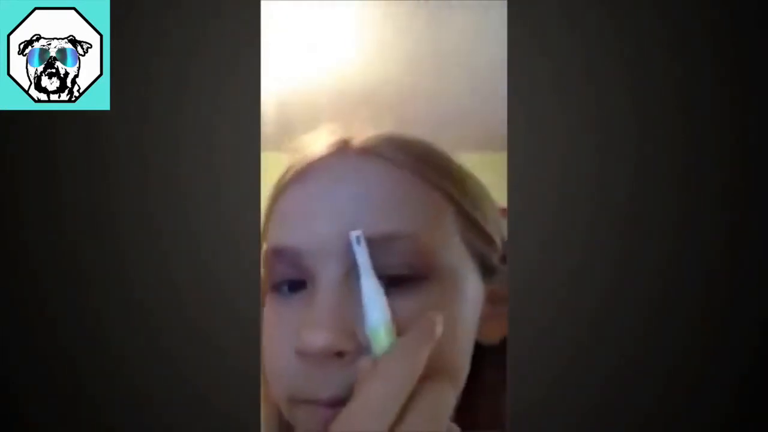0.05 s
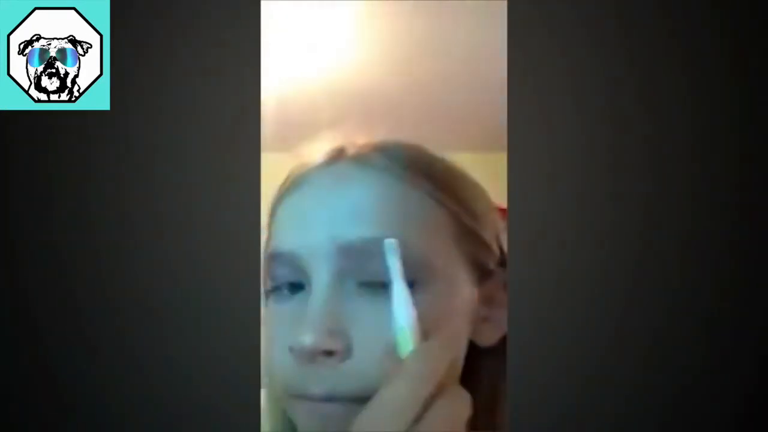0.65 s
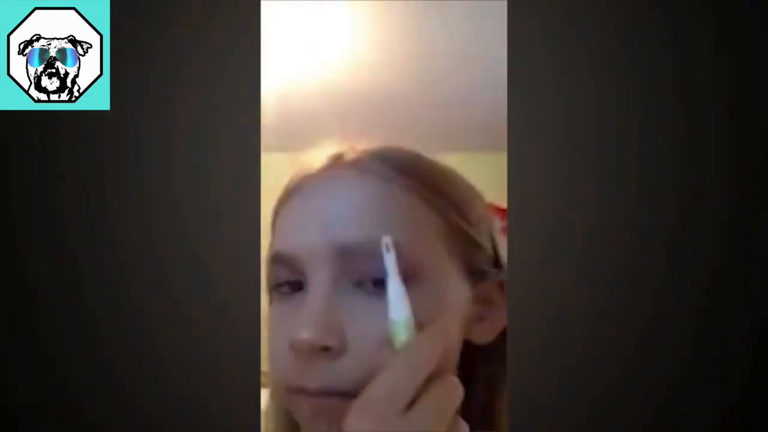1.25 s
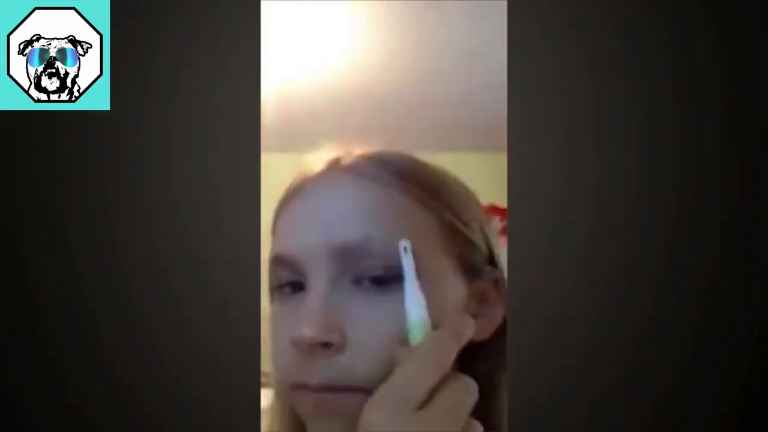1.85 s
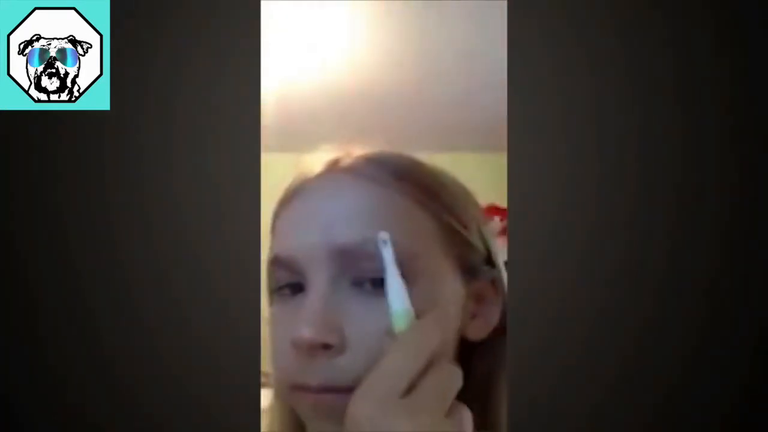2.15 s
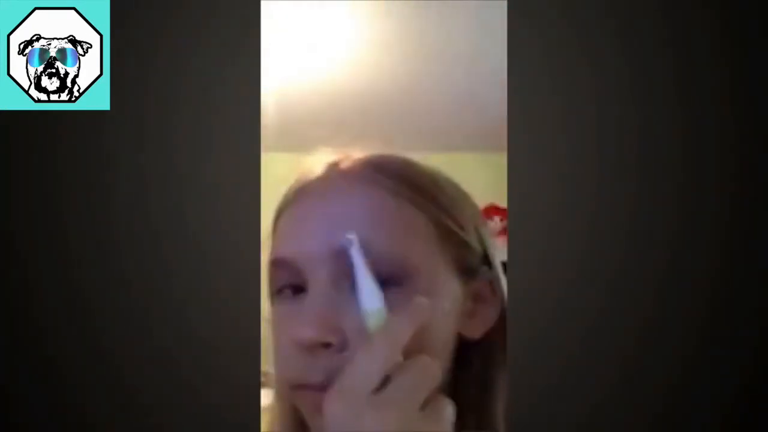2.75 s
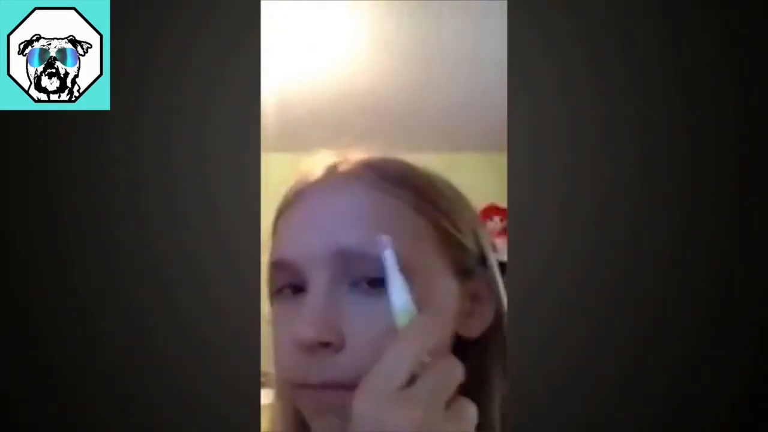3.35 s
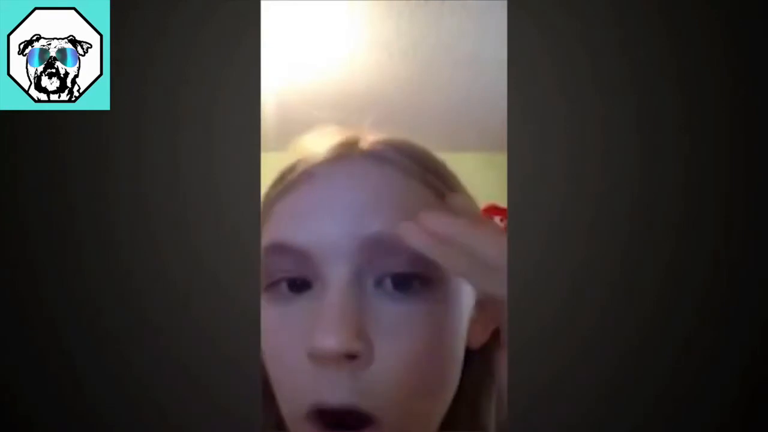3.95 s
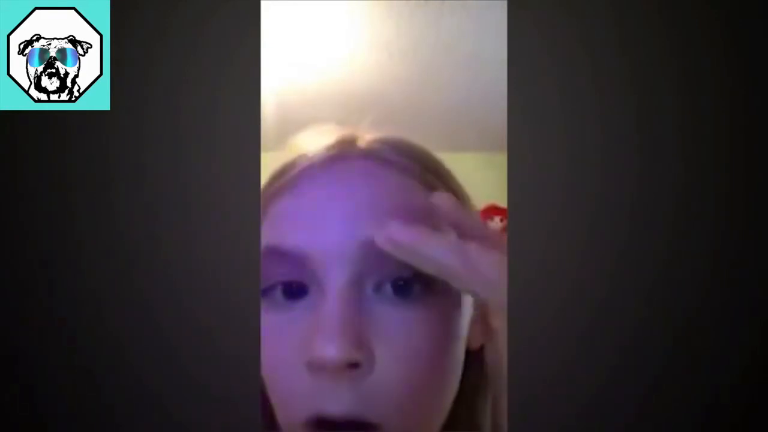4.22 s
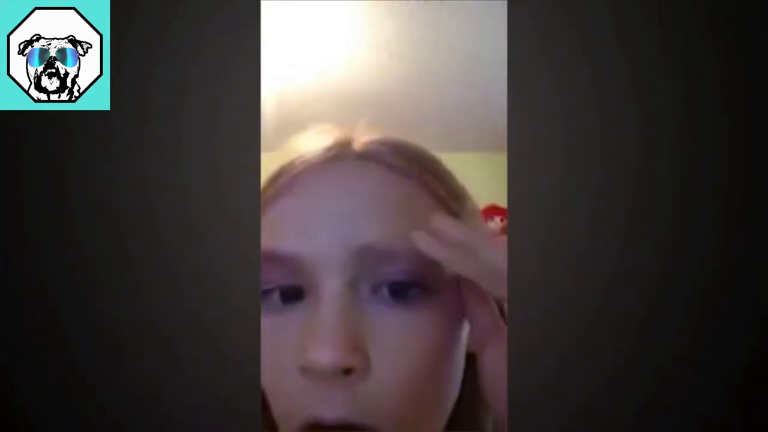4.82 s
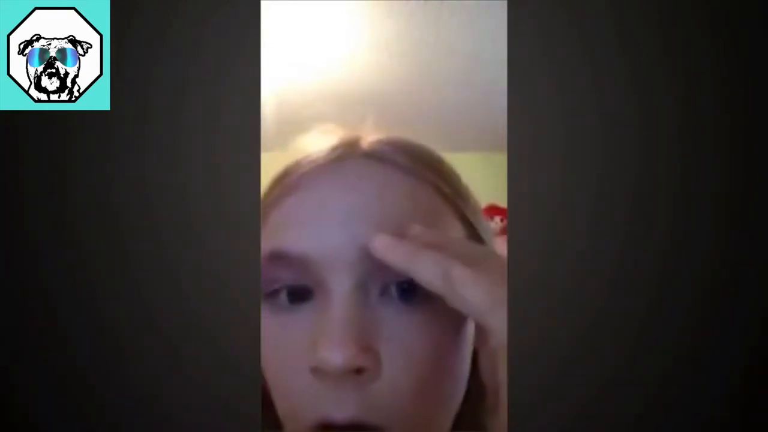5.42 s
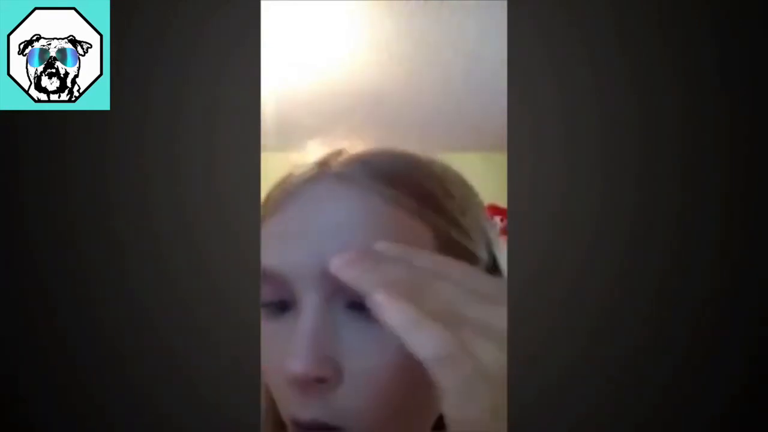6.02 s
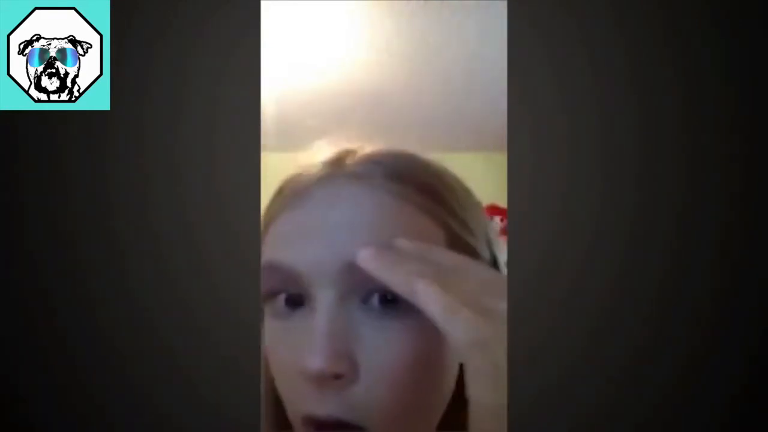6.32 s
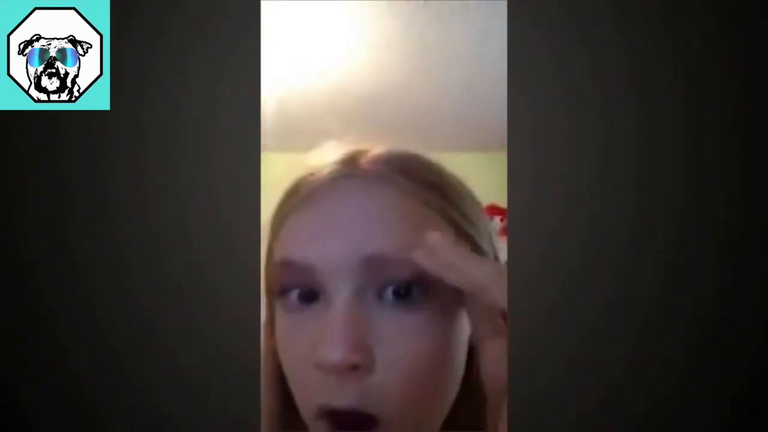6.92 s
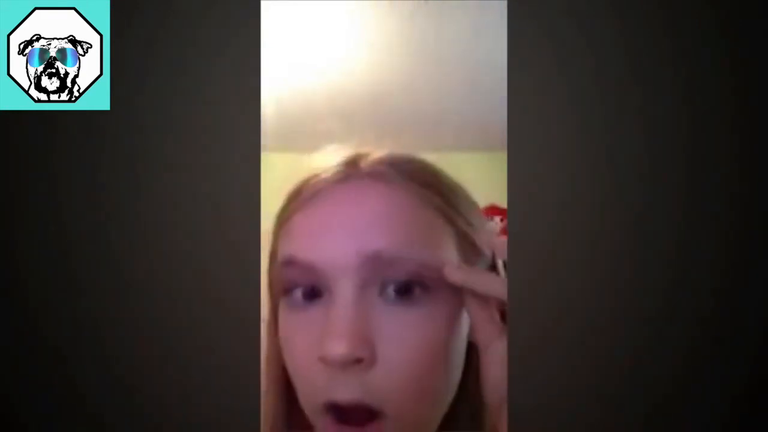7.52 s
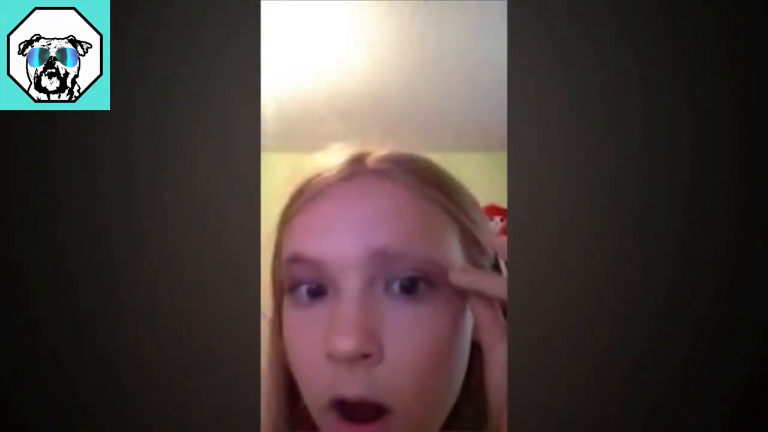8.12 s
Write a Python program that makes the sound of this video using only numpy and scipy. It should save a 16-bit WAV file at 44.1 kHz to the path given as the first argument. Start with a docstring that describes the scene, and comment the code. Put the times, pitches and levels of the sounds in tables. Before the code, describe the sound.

From the start, a small battery eyebrow trimmer buzzes close to a phone microphone in a bedroom. The sound is fairly quiet, thin and bright, a fast rattle in a plastic shell with a faint motor whine and little bass. The motor slows slightly as it presses against skin five times, at about 0.6, 1.3, 1.9, 2.4 and 3.3 seconds. Around 3.7 seconds there is a soft, brief knock with a dull rub as the trimmer is swung away. The buzz shifts in tone, sizzles briefly at 4 seconds, then runs on more evenly. Just after 6 seconds it swells a little and dips in pitch, then switches off abruptly at about 6.4 seconds. Only a thin hiss and the very faint hum of a distant appliance remain until the end, at about 8 seconds.

```python
"""Eyebrow trimmer in a bedroom

Close to a phone's microphone, a small battery drive rattles in a thin plastic shell, about 46 strokes
a second. It is pressed to the brow five times, which slows the motor, swung away with a soft knock,
held lower down, then switched off. A faint hum from a distant appliance and a thin hiss remain."""
import sys
import numpy as np
from scipy import signal
from scipy.fft import rfft, irfft, next_fast_len
from scipy.io import wavfile
from scipy.ndimage import map_coordinates

SR = 44100
rng = np.random.default_rng(int(sys.argv[2]) if len(sys.argv) > 2 else 0)


def master(y):
    """Save y as 16-bit WAV."""
    cut = np.clip(np.atleast_2d(y).T, -1, 1)
    pcm = np.round(cut * 32767)  # scale
    wavfile.write(sys.argv[1], SR, pcm.astype(np.int16))


N = 360076
T = np.arange(N) / SR

# the shell's resonances and notches in each of four holds: (centre [Hz], width [Hz], gain [dB])
BROW_PEAKS = [(1393, 21, 8.5), (1637, 100, -6.5), (2724, 204, 3.5), (3740, 99, 3), (4165, 205, -6.5),
              (4585, 830, 7), (5920, 390, -5), (6944, 17, 10), (7830, 103, -13), (10100, 170, 4.5)]
SWUNG_PEAKS = [(2250, 370, 7), (4230, 120, -7), (6050, 470.0, 0.5), (8330, 340, 3.5)]
LOWERED_PEAKS = [(1480, 150, 4.5), (2060, 156, 9.5), (2250, 400, -10), (3500, 140, 2.5), (3530, 244, 6.5),
                 (4170, 95, -4.5), (5570, 310, 9), (6120, 87, 9.5), (6490, 240, 7.5), (7170, 580, 5),
                 (7920, 210, -13.5), (8700, 145, 3.5), (13250, 500, 5.5), (14200, 270, -2)]
SWITCH_PEAKS = [(1280, 560, 11), (3490, 460, 8.5), (5420, 370, 9.5), (7000, 1150, 6.5), (7760, 190.0, -10)]
# the hand passes from one hold to the next: (start [s], end [s])
REGRIPS = [(3.55, 3.91), (3.9, 4.086), (6.12, 6.19)]
# the cutting head's broad ring, which skin damps: (time [s], gain [dB])
HEAD_RING = [(0, -1), (.7, 1), (1.0, 1), (1.7, 0), (2.52, -2.5), (2.65, -9), (2.78, -0.5), (3.35, 0.2),
             (3.62, -4.5), (3.82, -3), (3.94, 5), (4.1, -1), (6.3, -1)]
# the part of the buzz that sizzles: (frequency [Hz], share [0-1])
SIZZLE_SHARE = [(8000, 0.15), (11000, 0.75)]
def trimmer(level_db, head_hz=5000, head_width_hz=740, off_s=6.357, stop_t60_s=0.1):
    """Close to the microphone, the buzz changes colour with the hold and dies as the power is cut."""
    force = drive(idle_db=-0.5, rattle_db=0.0, scrape_db=-2.5, uneven_db=0.31)
    buzz = shell(force, BROW_PEAKS)
    for span, peaks in zip(REGRIPS, (SWUNG_PEAKS, LOWERED_PEAKS, SWITCH_PEAKS)):
        share = np.interp(T, span, (0, 1))
        buzz = (1 - share) * buzz + share * shell(force, peaks)
    buzz_db, sizzle_db = handling()
    head = band(buzz, lambda hz: bell(hz, head_hz, head_width_hz))
    sizzle = band(buzz, lambda hz: along(SIZZLE_SHARE, hz))
    buzz = buzz + (amp(curve(HEAD_RING)) - 1) * head + (amp(sizzle_db) - 1) * sizzle
    buzz += whine(flutter_db=1.5)
    stop_db = -60 * np.maximum(T - off_s, 0) / stop_t60_s
    return buzz * amp(level_db + buzz_db + stop_db)


# the blade's blows and rebounds, repeating every three strokes:
# (position [strokes], width [strokes], level on the brow [dB], level running free [dB])
BLADE_BLOWS = [(.33, 0.17, -6.5, -1), (.56, 0.24, 0, -0.5), (1.45, 0.1, 1.5, 4), (1.71, 0.15, 0.5, 3.5),
               (2.4, 0.11, 2, 1.5), (2.69, 0.19, -8, 0.5)]
def drive(idle_db, rattle_db, scrape_db, uneven_db, cycle=3):
    """Contacts, rattle and blade scrape, all swelling with each blow of the blade."""
    strokes = strokes_done()
    free = np.interp(T, REGRIPS[0], (0, 1))
    power = amp(idle_db) ** 2
    for position, width, brow_db, free_db in BLADE_BLOWS:
        apart = (strokes - position + cycle / 2) % cycle - cycle / 2
        blow_db = (1 - free) * brow_db + free * free_db
        power = power + amp(blow_db) ** 2 * bell(apart, 0, width)
    stroke_gain = amp(uneven_db * rng.standard_normal(N)[strokes.astype(int)])
    clicks = contacts(strokes, jitter_s=9e-6, scatter_db=7) + amp(rattle_db) * rattle(per_second=2200)
    scrape = amp(scrape_db) * rng.standard_normal(N)
    return np.sqrt(power) * stroke_gain * (clicks + scrape)


# hard, tiny contacts carry little bass: (frequency [Hz], gain [dB])
CONTACT_COLOUR = [(700, -5.5), (1400, 0.5), (3000, -1.5), (6500, -3), (12000, -1.5)]
def contacts(strokes, jitter_s, scatter_db, count=80):
    """The same rough spots meet in every stroke, never quite equally hard."""
    spots = (np.arange(count) + rng.random(count)) / count
    at = np.arange(-1, int(strokes[-1]) + 1)[:, None] + spots
    sizes = np.sign(rng.standard_normal(count)) * amp(scatter_db * (2 * rng.random(at.shape) - 1))
    times = np.interp(at, strokes, T) + jitter_s * rng.standard_normal(at.shape)
    inside = (at > strokes[0]) & (at < strokes[-1])
    clicks = pulses(times[inside], sizes[inside])
    return unit(coloured(clicks, lambda hz: along(CONTACT_COLOUR, hz)))


def rattle(per_second):
    """Loose parts click at random moments."""
    hits = rng.random(N) < per_second / SR
    return unit(hits * (2 * rng.random(N) - 1))


# how the small shell radiates: (frequency [Hz], gain [dB])
SHELL_COLOUR = [(100, -57), (450, -30), (1000, -23), (1800, -16.5), (2700, -0.7), (5000, -0.0), (9000, 0.5),
                (10500, -5.5), (12000, -12.5), (13500, -14)]
def shell(force, peaks):
    """The plastic shell's ring under one hold of the fingers, at rms 1."""
    def peaks_db(hz):
        return sum(db * bell(hz, centre, width) for centre, width, db in peaks)
    return unit(coloured(force, lambda hz: along(SHELL_COLOUR, hz) + peaks_db(hz)))


# motor tones: (frequency [multiples of the stroke rate], unloaded level against the buzz [dB])
MOTOR_TONES = [(29, -51), (30, -38), (31, -40)]
def whine(flutter_db, flutter_hz=30, db_per_load=-1.7):
    """The motor's thin tone follows the drive's speed, flutters a little and fades under load."""
    strokes = strokes_done()
    tones = np.zeros(N)
    for multiple, db in MOTOR_TONES:
        flutter = map_coordinates(rng.standard_normal((N // SR + 2) * flutter_hz), [T * flutter_hz])
        phase = 2 * np.pi * (multiple * strokes + rng.random())
        tones += amp(db + flutter_db * flutter) * np.sqrt(2) * np.sin(phase)
    return amp(db_per_load * load()) * tones


# presses on the blade, the first five at the brow: (middle [s], half-length [s], speed lost [strokes/s])
PRESSES = [(.61, .34, 2.66), (1.27, .23, 4.11), (1.87, .23, 3.6), (2.42, .16, 3.14), (3.3, .4, 2.88),
           (4.17, .38, .78), (6.26, .12, 4.74)]
def load():
    """Strokes per second that the presses take from the motor."""
    return sum(lost * bell(T, middle_s, half_s) for middle_s, half_s, lost in PRESSES)


def strokes_done(free_hz=47.11, first_stroke=0.15):
    """The running count of strokes, at the free speed less the load."""
    return first_stroke + np.cumsum(free_hz - load()) / SR


# the four holds as the hand drifts: (buzz [dB], buzz drift [dB/s], sizzle [dB], sizzle drift [dB/s])
HOLD_LEVELS = [(-37, -0.3057, -3.5, 1.36), (-36.5, 7, -4.5, -4), (-36.5, 0.21, -2.5, 1.6), (-39, -9, 4, 8)]
# brief flares as the fingers shift: (middle [s], half-length [s], buzz [dB], sizzle [dB])
FLARES = [(4.016, .04, 0.5, 8), (6.084, 0.061, 1.5, -.5)]
def handling(buzz_db_per_load=-0.3658, sizzle_db_per_load=0.5):
    """Buzz and sizzle in dB; the aim of the tip sets how much sizzle reaches the microphone."""
    def held(since_s, db, drift_db, sizzle_db, sizzle_drift_db):
        return np.array([db + drift_db * (T - since_s), sizzle_db + sizzle_drift_db * (T - since_s)])
    levels = held(0, *HOLD_LEVELS[0])
    for span, hold in zip(REGRIPS, HOLD_LEVELS[1:]):
        levels += np.interp(T, span, (0, 1)) * (held(span[1], *hold) - levels)
    for middle_s, half_s, *flare_db in FLARES:
        levels += np.outer(flare_db, bell(T, middle_s, half_s))
    return levels + np.outer((buzz_db_per_load, sizzle_db_per_load), load())


# soft bumps as the hand comes down: (time [s], level [dB], pitch [Hz], time to fall 60 dB [s])
BUMPS = [(3.626, -38, 610, 0.0082), (3.636, -44, 570, .015), (3.674, -46, 620, 0.032),
         (3.682, -43.5, 286, 0.1), (3.689, -37, 885, 0.024), (3.704, -36.5, 1090, 0.024),
         (3.721, -26.5, 884, 0.016), (3.731, -46, 231, 0.027)]
# the dull rub under them: (frequency [Hz], level [dB])
RUB_COLOUR = [(88, -61), (150, -29), (269, -7), (425, -21), (875, -9.5), (1400, -19), (1460, -19),
              (1900, -11), (2470, -51), (4180, -120)]
def knock(bump_db, rub_db, attack_cycles, rub_s=3.684, hold_s=0.049, rise_s=0.031, fall_s=0.014):
    """Damped bumps over a short rub, right by the microphone; low bumps start more softly."""
    rise = np.minimum(T - rub_s, 0) / rise_s
    fall = np.minimum(rub_s + hold_s - T, 0) / fall_s
    out = amp(rub_db) * np.exp(rise + fall) * noise(RUB_COLOUR)
    t = np.arange(SR // 5) / SR
    for start_s, db, hz, t60 in BUMPS:
        attack = 1 - bell(t, 0, attack_cycles / hz)
        ring = attack * np.sin(2 * np.pi * hz * t)
        out[round(start_s * SR):][:len(t)] += ring * amp(bump_db + db - 60 * t / t60)
    return out


# the bedroom's reverberation: (frequency [Hz], time to fall 60 dB [s])
ROOM_DECAY = [(300, 0.59), (3000, 0.26), (12000, 0.18)]
def bedroom(x, wet_db):
    """A short soft echo follows the direct sound to the microphone, the treble dying first."""
    hz, t, spectrum = signal.stft(rng.standard_normal(SR // 3), SR, nperseg=256)
    decay = amp(-60 * t / along(ROOM_DECAY, hz)[:, None])
    tail = signal.istft(spectrum * decay, SR)[1]
    tail = np.pad(tail, (SR // 300, 0))  # about 3 ms behind the direct sound
    return x + amp(wet_db) * signal.fftconvolve(x, tail / np.linalg.norm(tail))[:N]


# room tone and microphone hiss: (frequency [Hz], level [dB])
AIR_COLOUR = [(25, -57), (60, -16), (80, -7), (100, -8), (135, 0.5), (200, -1.5), (300, -3.5), (600, -10),
              (1800, -14), (3300, -8.5), (4200, -11), (5400, -1.5), (6200, -8.5), (9000, -14.5),
              (13500, -23)]
# the appliance's hum: (frequency [Hz], level [dB])
HUM_TONES = [(132, -89), (160, -83), (240, -84.5)]
def background(air_db, hum_db):
    """Steady room tone and hiss, with an appliance humming far from the microphone."""
    hum = sum(amp(db) * np.sqrt(2) * np.sin(2 * np.pi * (hz * T + rng.random())) for hz, db in HUM_TONES)
    return amp(air_db) * noise(AIR_COLOUR) + amp(hum_db) * hum


def amp(db):
    """Decibels to gain."""
    return 10 ** (np.asarray(db) / 20)


def unit(x):
    """Scaled to rms 1."""
    return x / np.sqrt(np.mean(x ** 2) + 1e-20)


def bell(x, middle, width):
    """A smooth rise and fall, 1 at its middle."""
    return np.exp(-((x - middle) / width) ** 2)


def curve(rows):
    """(time [s], value) rows joined up, one value per sample."""
    return np.interp(T, *np.transpose(rows))


def along(points, hz):
    """(frequency [Hz], value) points joined up on a log axis."""
    freqs, values = np.transpose(points)
    return np.interp(np.log(hz + 1), np.log(freqs + 1), values)


def coloured(x, gain_db, size=8192):
    """x through a causal filter whose gain in dB is a function of frequency."""
    cepstrum = irfft(np.log(amp(gain_db(np.fft.rfftfreq(size, 1 / SR))) + 1e-6))
    cepstrum[1:size // 2] *= 2  # folded for minimum phase
    cepstrum[size // 2 + 1:] = 0
    return signal.fftconvolve(x, irfft(np.exp(rfft(cepstrum))))[:N]


def band(x, share):
    """The part of x given by a share for each frequency."""
    size = next_fast_len(N + SR // 2)
    return irfft(rfft(x, size) * share(np.fft.rfftfreq(size, 1 / SR)), size)[..., :N]


def noise(colour):
    """Noise of rms 1 with a given colour."""
    return unit(coloured(rng.standard_normal(N), lambda hz: along(colour, hz)))


def pulses(times, sizes, reach=8):
    """Clicks placed between samples, each a windowed sinc."""
    at = times[:, None] * SR
    index = np.floor(at).astype(int) + np.arange(1 - reach, reach + 1)
    shape = np.sinc(index - at) * np.cos(np.pi * (index - at) / (2 * reach)) ** 2
    return np.bincount(np.clip(index, 0, N).ravel(), (sizes[:, None] * shape).ravel(), N + 1)[:N]


def scene():
    """Trimmer and knock at one microphone in the bedroom; the knock is closer and drier."""
    buzz = bedroom(trimmer(level_db=-0.22), wet_db=-12.0)
    bumps = bedroom(knock(bump_db=-1.0, rub_db=-52, attack_cycles=0.56), wet_db=-17.5)
    return (buzz + bumps + background(air_db=-70, hum_db=1.0))[None]


def record(dry):
    """The phone keeps nothing above its band limit."""
    return band(dry, lambda hz: hz < 13900)


dry = scene()
out = record(dry)
master(out)
```